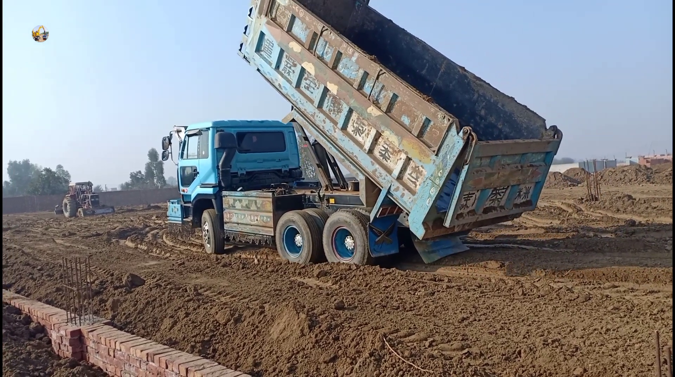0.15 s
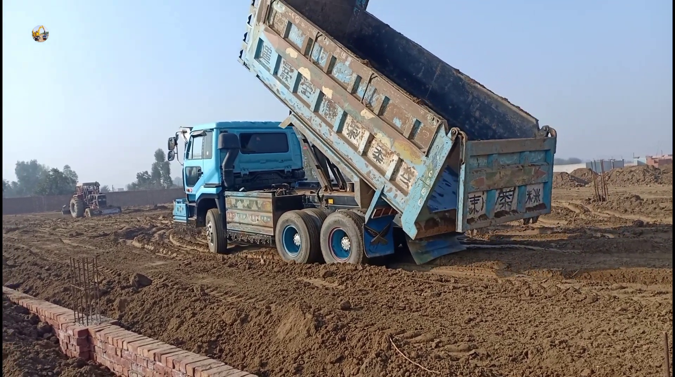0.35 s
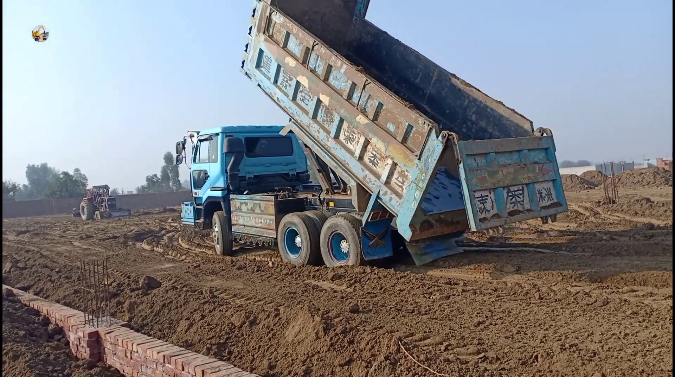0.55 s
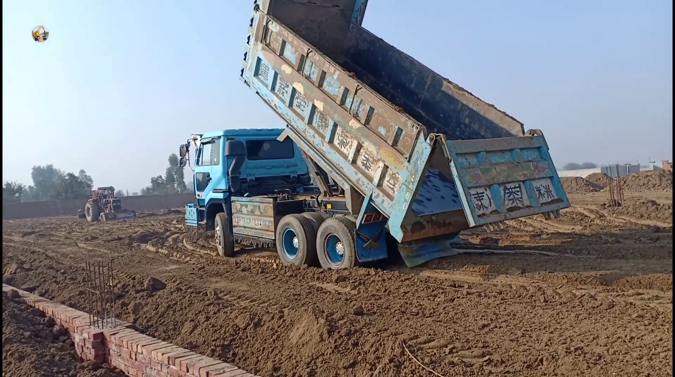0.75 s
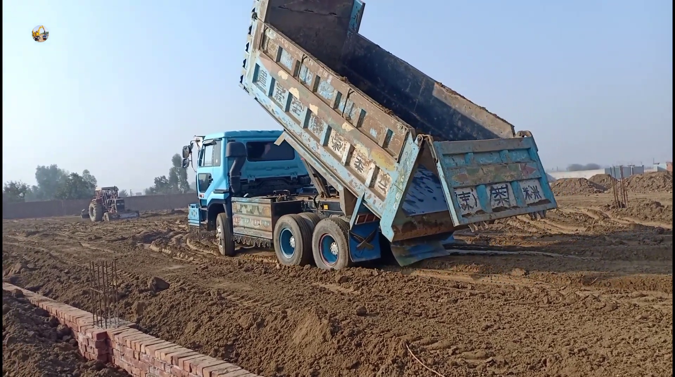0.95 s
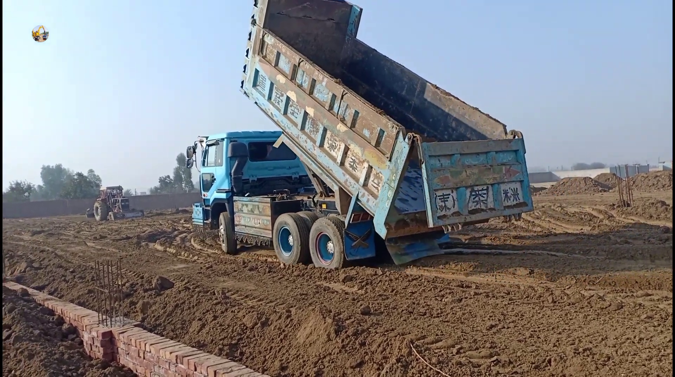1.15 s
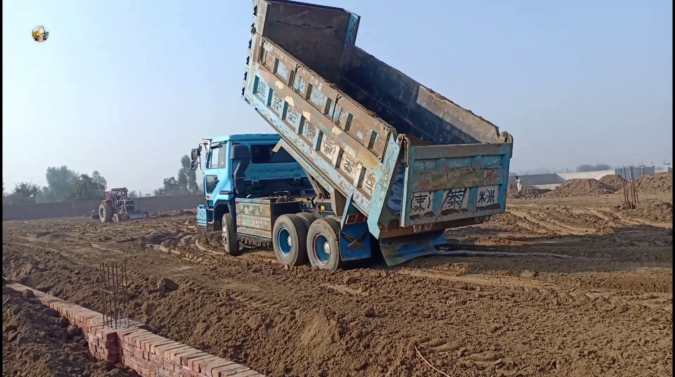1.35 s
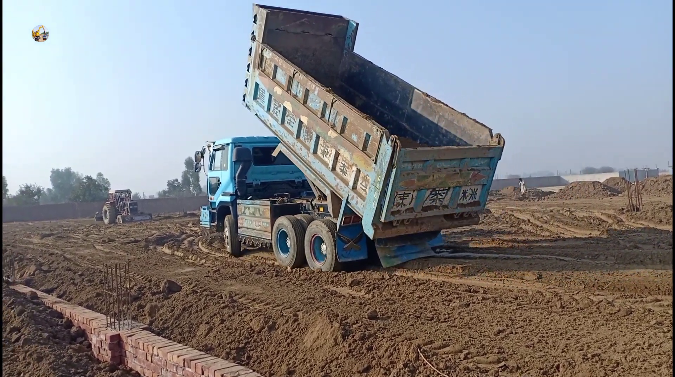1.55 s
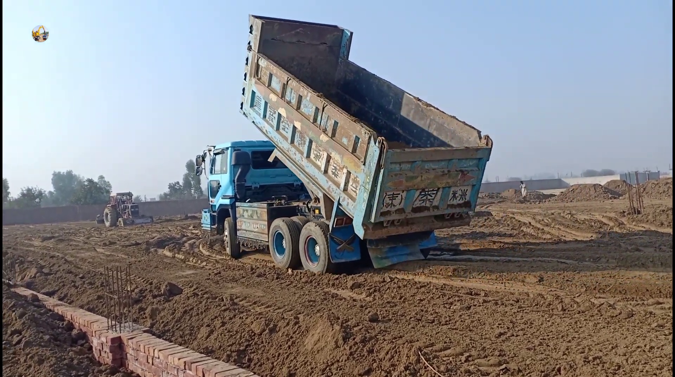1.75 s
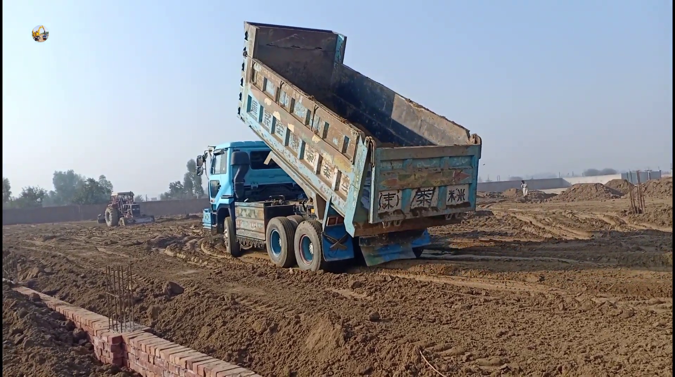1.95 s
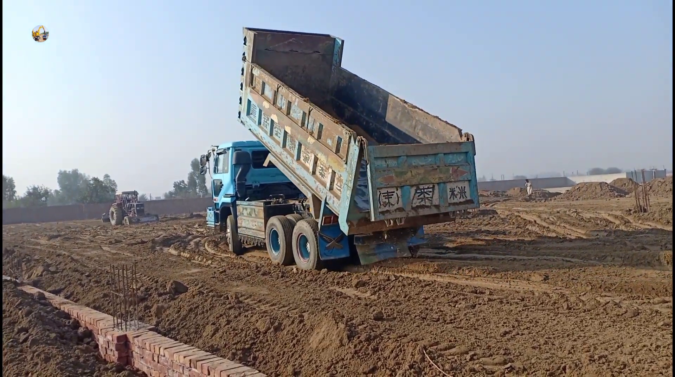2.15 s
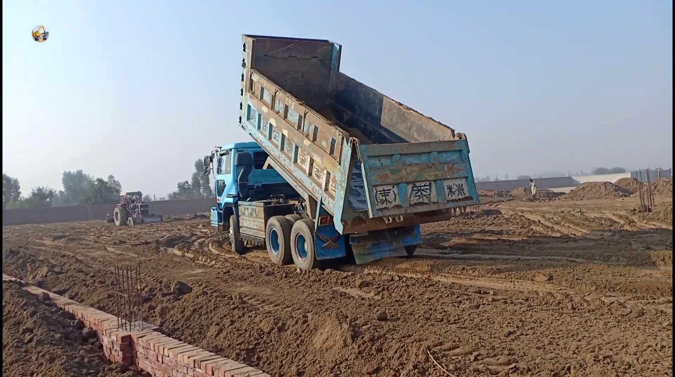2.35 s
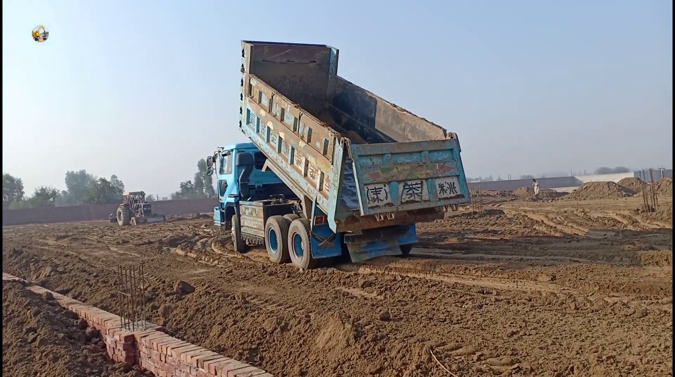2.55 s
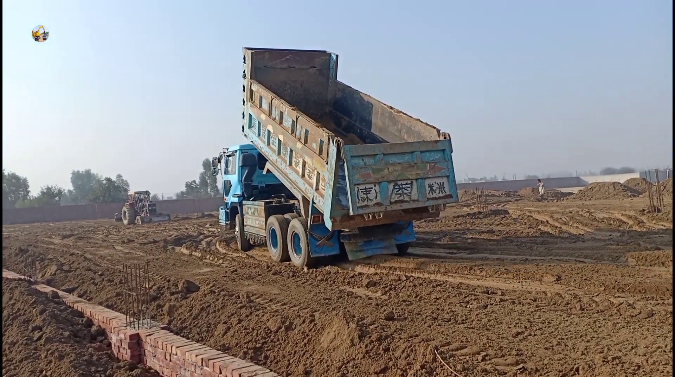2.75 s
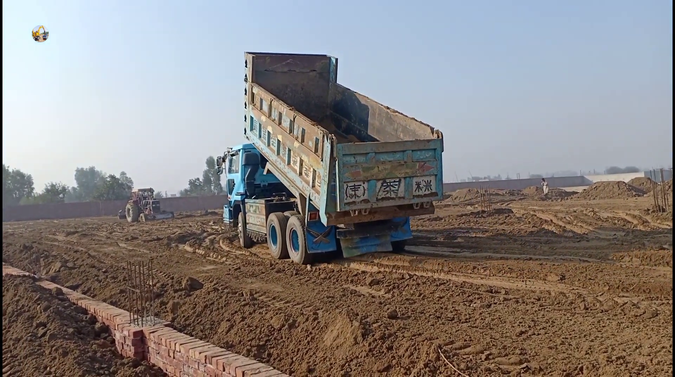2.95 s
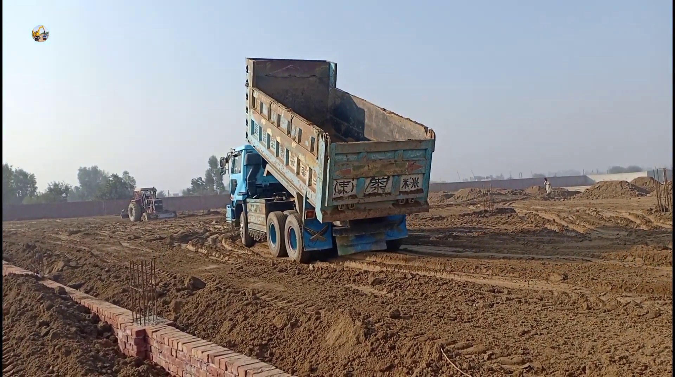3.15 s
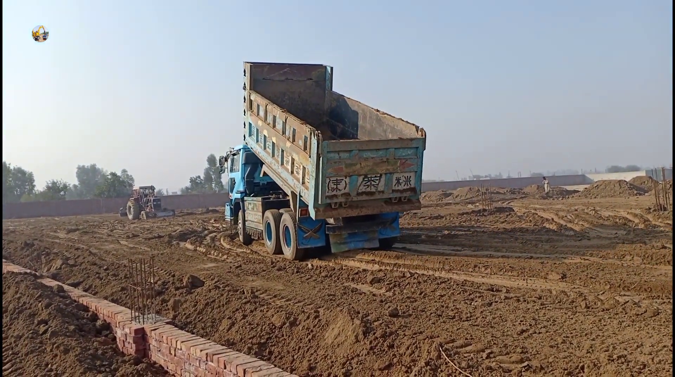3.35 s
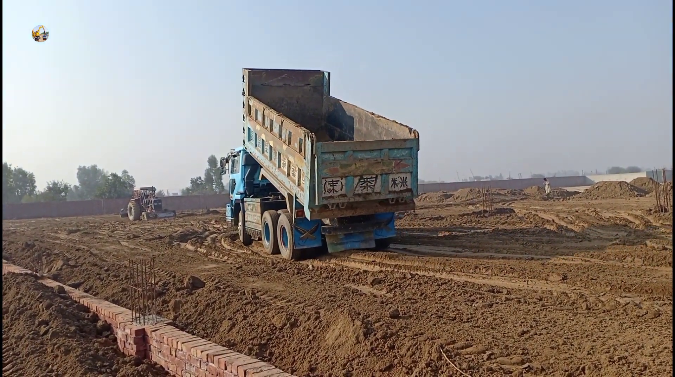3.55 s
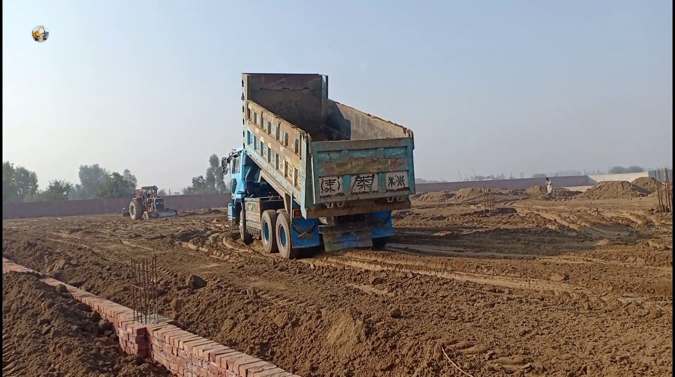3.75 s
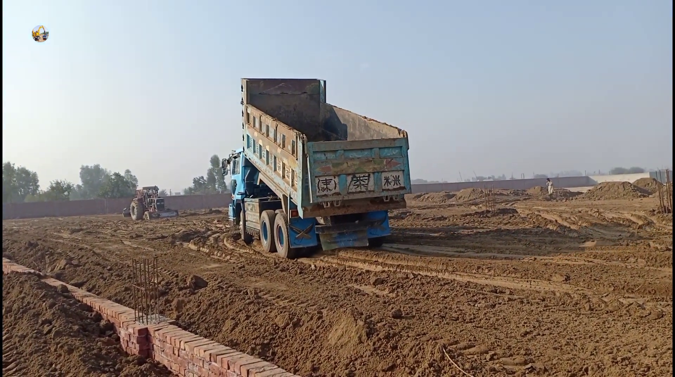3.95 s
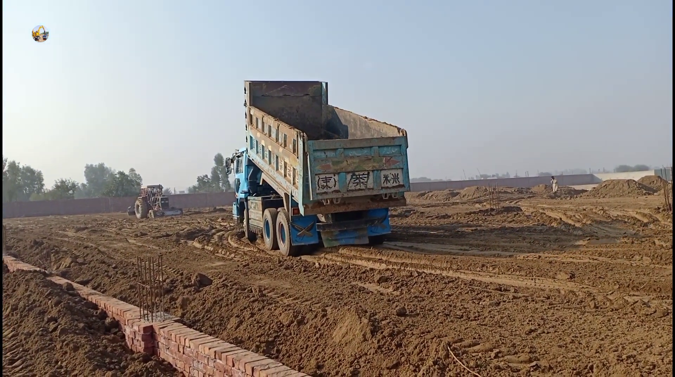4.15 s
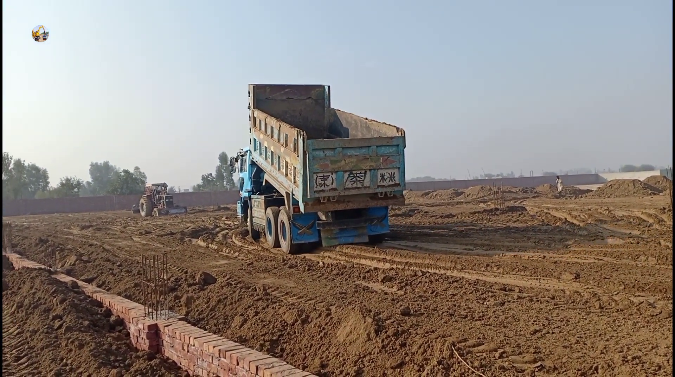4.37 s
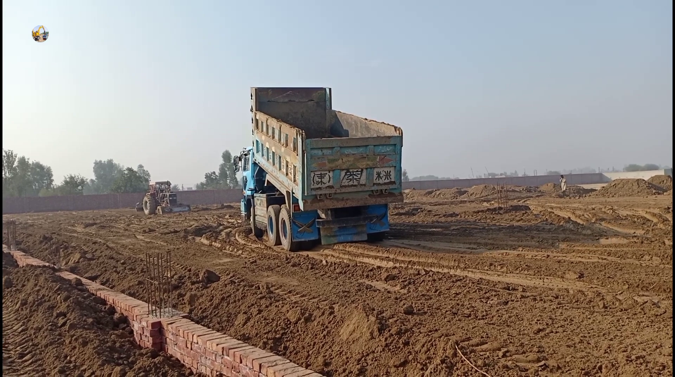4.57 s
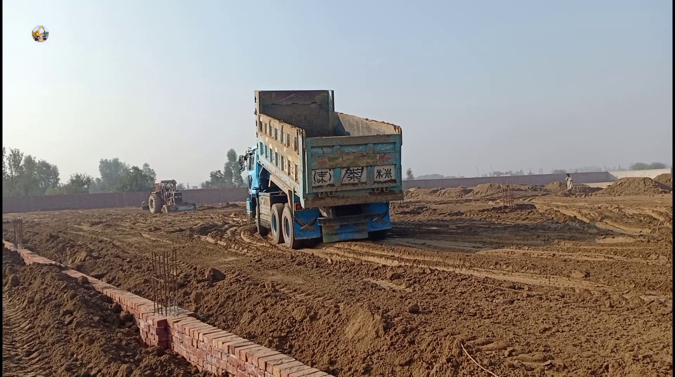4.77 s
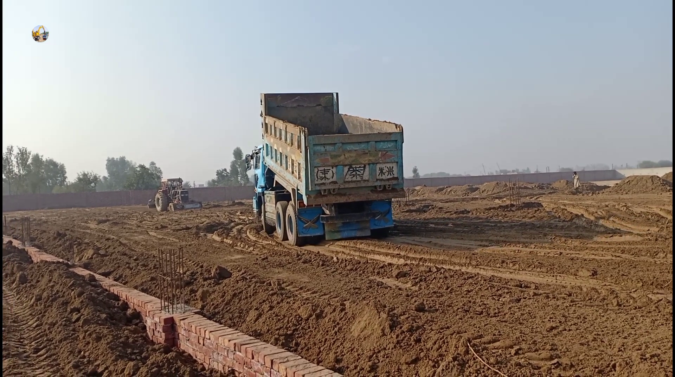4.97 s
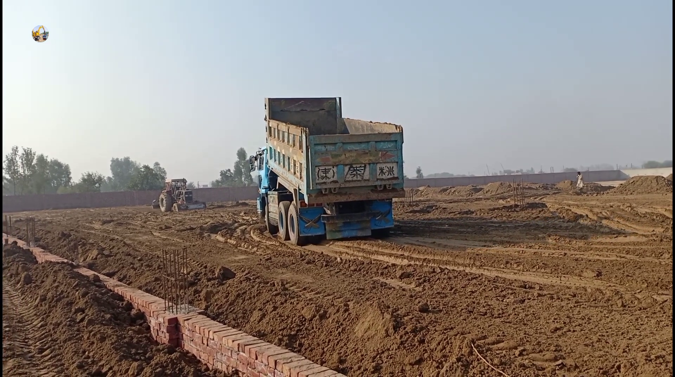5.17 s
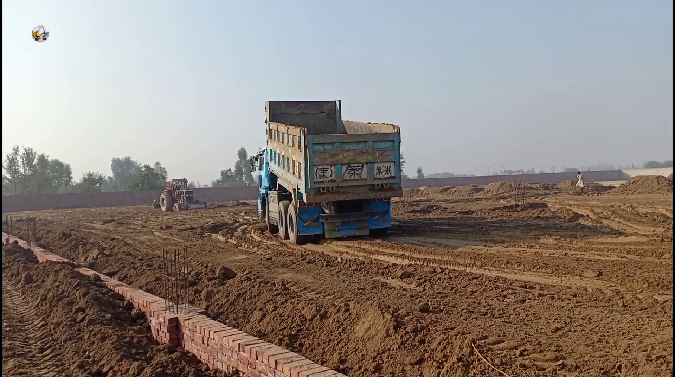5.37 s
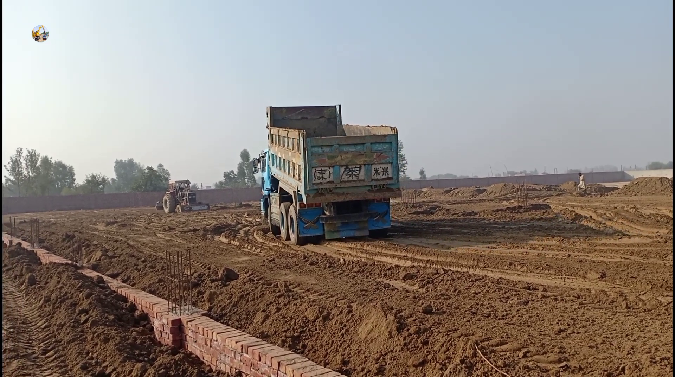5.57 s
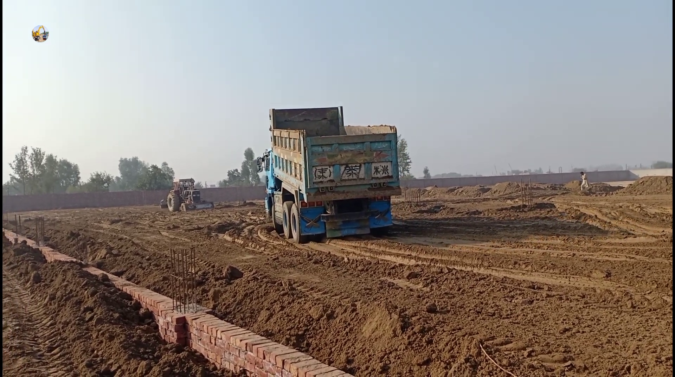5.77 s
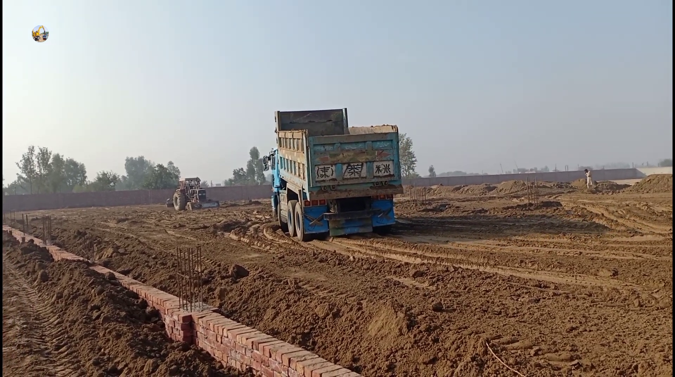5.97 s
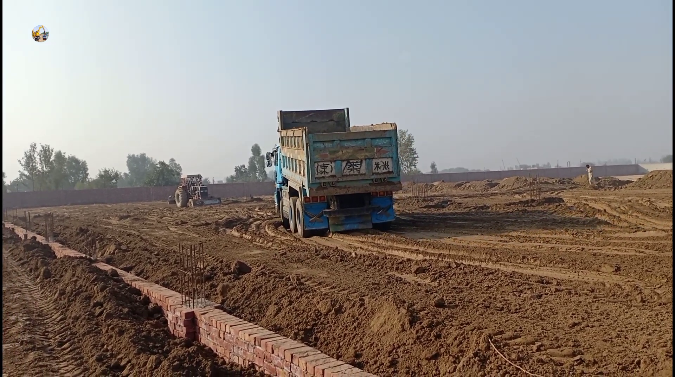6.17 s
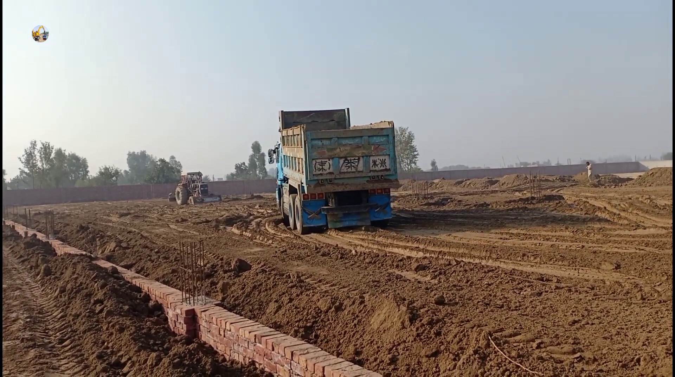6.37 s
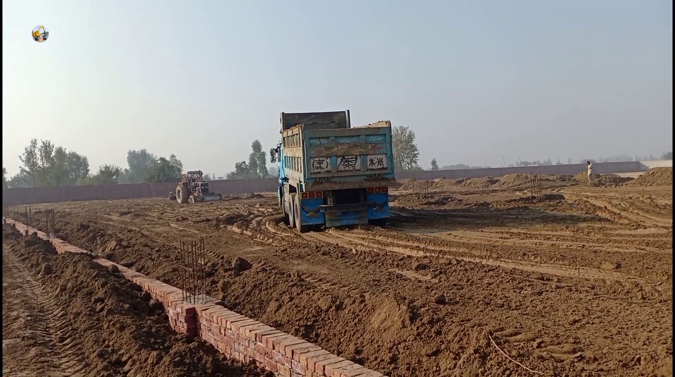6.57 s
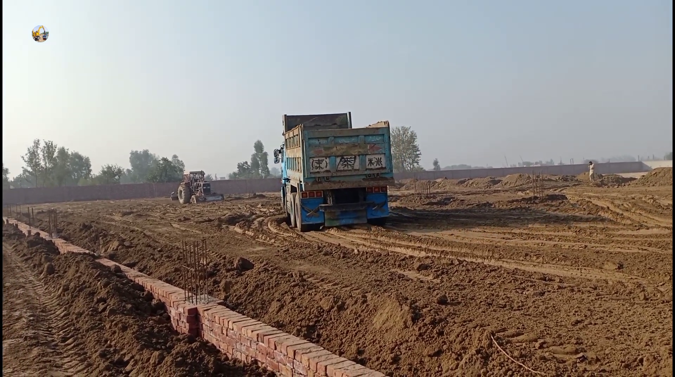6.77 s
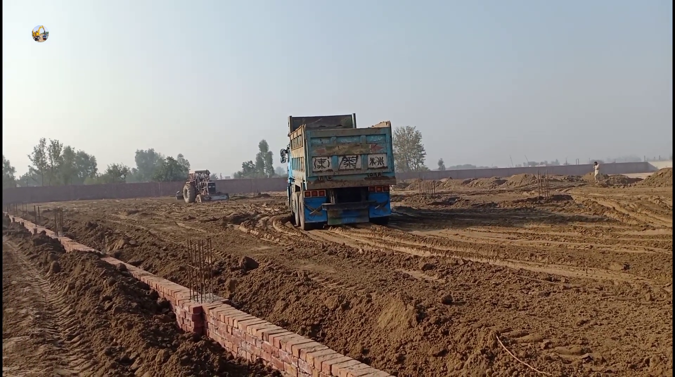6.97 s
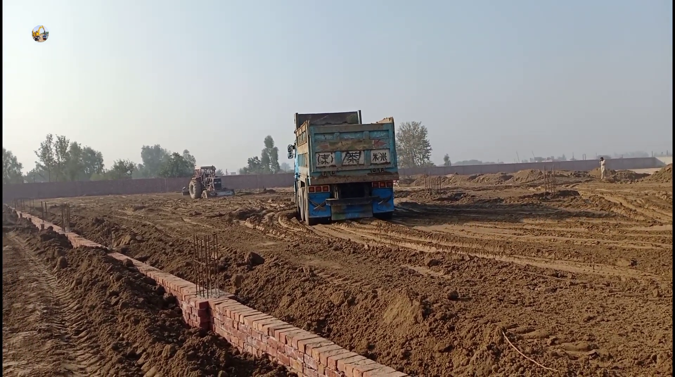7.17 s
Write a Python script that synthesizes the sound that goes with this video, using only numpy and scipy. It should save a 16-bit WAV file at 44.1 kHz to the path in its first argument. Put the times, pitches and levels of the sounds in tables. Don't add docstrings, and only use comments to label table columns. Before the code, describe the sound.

Outdoors on open soil, a diesel dump truck chugs with a low, uneven throb and engine clatter, slowly drawing away. Its loose steel tailgate slams four times, each a deep thump and harsh sheet-metal crash with quick rebounds and a faint bright echo off a wall. Small chain and latch clanks follow. A hand partly covers the right side of the handheld stereo microphone, dulling it, and pops it near the end.

```python
import sys
import numpy as np
from scipy import signal
from scipy.fft import rfft, irfft, next_fast_len
from scipy.io import wavfile
from scipy.ndimage import uniform_filter1d

SR = 44100
rng = np.random.default_rng(int(sys.argv[2]) if len(sys.argv) > 2 else 0)


def volts_from_decibels(level):
    exponent = np.asarray(level, float) / 20
    return 10 ** exponent


def unload_audio(sound):
    columns = np.transpose(np.atleast_2d(sound))
    steps = np.round(np.clip(columns, -1, 1) * 32767)
    wavfile.write(sys.argv[1], SR, steps.astype(np.int16))


N = 318402


def evened(x):
    return x / np.sqrt(np.mean(x ** 2) + 1e-20)


def read(points, hz):
    f, value = np.transpose(points)
    return np.interp(np.log(hz + 1), np.log(f + 1), value)


def add(mix, s, sound):
    part = mix[round(s * SR):][:len(sound)]
    part += sound[:len(part)]


def shaped(x, gain):
    size = next_fast_len(x.shape[-1] + 4096)
    spectrum = rfft(x, size) * gain(np.fft.rfftfreq(size, 1 / SR))
    return irfft(spectrum, size)[..., :x.shape[-1]]


def resonate(x, hz, width):
    pole = np.exp((2j * hz - width) * np.pi / SR)
    return 2 * signal.lfilter([1 - abs(pole)], [1, -pole], x).real


def wander(per_s):
    knots = uniform_filter1d(rng.standard_normal(200), size=3)
    return evened(np.interp(np.arange(N) / SR * 3 * per_s, np.arange(len(knots)), knots))


# [f/Hz, level/dB per Hz]
SHEET_COLOUR = [(24, -50), (40, -26.5), (90, -0.5), (187, -4.5), (329, -4.5), (431, -16.5), (670, -10.5),
                (992, -21.5), (1400, -12.5), (1620, -14.5), (2020, -14), (4210, -21.5), (14000, -86)]
# [f/Hz, t60/s]
SHEET_DECAY = [(60, 0.9), (150, 0.47), (400, 0.77), (800, 0.43), (2000, 0.31), (5000, 0.11), (12000, 0.46)]


def sheet_ring(t):
    hz, frame_t, z = signal.stft(rng.standard_normal(len(t)), SR, nperseg=256)
    decay = volts_from_decibels(-60 * frame_t / read(SHEET_DECAY, hz)[:, None])
    sheet = signal.istft(z * decay, SR, nperseg=256)[1][:len(t)]
    return shaped(sheet, lambda f: volts_from_decibels(read(SHEET_COLOUR, f)))


# [f/Hz, level/dB, t60/s]
PANEL_MODES = [(163.1, -5.5, 1), (203, -7, 1), (233.4, 5.5, 0.07), (339.8, -3, 0.18), (367, -5, 1),
               (530.5, -4, 0.21), (630, -50, 1), (753, -7.5, 0.43), (825, -11, 0.69), (820, -24.5, 0.27),
               (1014, -40, 0.024)]


def panel_ring(t):
    where = rng.standard_normal((len(PANEL_MODES), 2))
    return sum(volts_from_decibels(db + 2.5 * a - 60 * t / min(t60, .5)) * np.sin(2 * np.pi * f * (1 + .02 * b) * t)
               for (f, db, t60), (a, b) in zip(PANEL_MODES, where))


# [f/Hz, width/Hz, level/dB]
RIB_MODES = [(1338, 28, -1), (2005, 60, 6), (2330, 10, 2.5), (2556, 71, 0), (3070, 84, 4.5), (3660, 74, 10),
             (4120, 60, -2.5)]


def blow(treble_db, bass_db, top_db, clang_db, lag_s):
    t = np.arange(30000) / SR
    body = evened(sheet_ring(t)) + volts_from_decibels(-4.5) * evened(panel_ring(t))
    early = t[:SR // 4]
    chatter = rng.standard_normal(SR // 4) ** 5 * np.exp(-early / 0.022)
    chatter = 0.52 * chatter / np.linalg.norm(chatter) + (early == 0)
    ring = signal.fftconvolve(body, chatter)[:len(t)]
    grit = rng.standard_normal(len(t)) ** 3 * np.exp(-t / .06)
    grit = evened(shaped(grit, lambda f: volts_from_decibels(read(SHEET_COLOUR, f))))
    ring = evened(ring) + volts_from_decibels(-8.5) * grit * (t < .3)
    tilt = [(45, bass_db), (90, bass_db + 8.5), (250, 0.019), (400, 0.0091),
            (550, clang_db), (900, clang_db),
            (1700, treble_db + 8), (4300, treble_db + 13), (6000, treble_db + 13),
            (11000, treble_db + 11.5 + top_db), (12500, treble_db + 17 + top_db), (14000, treble_db - 9)]
    ring = ring / np.sqrt(np.mean(ring[:SR // 20] ** 2))
    ring = shaped(ring, lambda f: volts_from_decibels(read(tilt, f) + sum(db / (1 + ((f - at) / w) ** 2)
                                                          for at, w, db in RIB_MODES)))
    thump = shaped(ring, lambda f: 1 / (1 + (f / 600) ** 4))
    steel = ring - thump
    steel_onset = 1 - np.exp(-np.maximum(t - lag_s, 0) / 0.0012)
    return thump * (1 - np.exp(-t / 0.00076)) + steel * steel_onset


# [t/s, level/dB, treble level/dB, top level/dB, clang level/dB]
GATE_BLOWS = [(1.729, -14.5, -11, 0, 12.5), (1.754, -9, -13.5, -2, 8.5), (1.78, -17.5, -11, 6, 2.5),
              (1.819, -12, -16, 13.5, 5), (1.875, -11, -29, 3, -9), (3.321, -13.5, -12.5, 19, 11.5),
              (3.347, -10.5, -9.5, 15, 1.5), (3.399, -10, -15, 10, 3), (3.475, -13.5, -22, -5, 1),
              (4.742, -12.5, -11, 0, 4.5), (4.767, -9, -10, 1, 5), (4.809, -7.5, -22.5, 12, -8),
              (5.693, -14.5, -9, -6, 3.5), (5.719, -18.5, -5, 4.5, 3), (5.749, -12.5, -33, 7, 1.5),
              (4.845, -18, -10, -4, 0)]


def tailgate():
    gate, last_s = np.zeros(N), 0
    for s, db, treble_db, top_db, clang_db in GATE_BLOWS:
        full_swing = s - last_s > .5
        bass_db, lag_s = (-1.5, 0.0039) if full_swing else (-20, 0)
        add(gate, s, volts_from_decibels(db - 5) * blow(treble_db, bass_db, top_db, clang_db, lag_s))
        last_s = s
    return gate


# [slam t/s, delay/s, level/dB, fade/s, width/Hz]
WALL_ECHOES = [
    (1.732, .24, -25, .23, 2000),
    (3.322, .24, -23, 0.39, 2600),
    (4.741, .228, -11.5, 0.1, 1100),
    (5.693, 0.23, -13.5, 0.091, 1100),
]


def wall_echo(gate):
    back, t = np.zeros(N), np.arange(SR // 2) / SR
    for s, delay_s, db, fade_s, width in WALL_ECHOES:
        slam = gate[round(s * SR):][:len(t)]
        bright = resonate(resonate(slam, 2240, width), 2240, width)
        add(back, s + delay_s, volts_from_decibels(db + 5) * bright * np.exp(-t / fade_s))
    return back


# [eighth of the cycle, level/dB, pipe delay/s]
FIRING_ORDER = [(0, -1.2, 0), (5, -12, 0), (3, -.8, 0), (2, -9.6, 0), (7, -23.5, .0041), (6, -5.9, .0041),
                (4, -11, .0041), (1, -8.4, .0041)]


def firings(crank, eighth):
    return np.flatnonzero(np.diff(np.floor(crank - eighth / 8)))


# [f/Hz, level/dB]
PIPE_COLOUR = [(35, -38), (55, -20), (70, -12.3), (85, -13), (100, -7), (109, -2), (122, -5.5),
               (135, -18.5), (150, -23), (180, -24), (230, -40), (400, -62), (1500, -150)]


def exhaust(crank):
    pulses = np.zeros(N)
    for eighth, db, delay_s in FIRING_ORDER:
        at = firings(crank, eighth)
        pulses[np.clip(at + round(delay_s * SR), 0, N - 1)] += volts_from_decibels(db + .6 * rng.standard_normal(len(at)))
    return evened(shaped(pulses, lambda hz: volts_from_decibels(read(PIPE_COLOUR, hz)) * np.exp(-1j * np.arctan((hz - 88) / 6))))


# [f/Hz, width/Hz, level/dB]
COVER_MODES = [(703, 13.3, -29), (850, 13, -26), (1356, 57, -23.5), (2570, 20, -47), (4000, 35, -34),
               (5100, 500, -22)]
# [f/Hz, level/dB per Hz]
BLOCK_COLOUR = [(24, -34.5), (40, -24), (104, 6.5), (133, -5), (156, -18.5), (307, -16), (413, -24.5),
                (635, -20.5), (1340, -24), (1680, -20), (1970, -21), (3980, -23), (9000, -62.5),
                (11700, -86), (19800, -120)]


def block_clatter(crank):
    knock = np.zeros(N)
    for eighth, _, _ in FIRING_ORDER:
        at = firings(crank, eighth)
        knock[at] += volts_from_decibels(1.2 * rng.standard_normal(len(at)))
    bursts = evened(signal.lfilter([1], [1, -np.exp(-1 / (0.012 * SR))], knock))
    noise = (1 + 0.32 * bursts) * volts_from_decibels(.4 * wander(6.0)) * rng.standard_normal(N)
    noise = noise + sum(volts_from_decibels(db) * evened(resonate(noise, hz, width)) for hz, width, db in COVER_MODES)

    def colour(hz):
        ceiling_db = np.where(hz < 170, read(BLOCK_COLOUR, 250) - 3, 0)
        return volts_from_decibels(np.minimum(read(BLOCK_COLOUR, hz), ceiling_db))

    block = shaped(noise, colour)
    treble = shaped(block, lambda hz: 1 / (1 + (1500 / (hz + 1)) ** 4))
    return evened(block - treble), evened(treble)


GEAR_MESHES = (42, 84, 50, 40)
# [mesh index, middle t/s, half length/s, level/dB]
SINGING_SPELLS = [(0, 0.32, 0.37, -45), (1, 1.53, 0.44, -47), (0.5, 2.84, 0.19, -51.5), (0, 4.1, 0.36, -50),
                  (0, 6.85, .5, -47.5), (2, 6.73, 0.48, -50), (2, 3.9, .2, -61), (1.5, 7, 0.27, -61),
                  (0.5, 0.39, .5, -62), (3, 4.6, 0.27, -71)]


def gear_whine(crank):
    t = np.arange(N) / SR
    meshes = [volts_from_decibels(2.0 * wander(1.5)) * np.sin(2 * np.pi * k * crank) for k in GEAR_MESHES]
    singing = sum(volts_from_decibels(db) * np.exp(-((t - s) / half_s) ** 4) * meshes[round(k)]
                  for k, s, half_s, db in SINGING_SPELLS)
    return volts_from_decibels(-68.5) * sum(meshes) + singing


# [t/s, cycles a second]
ENGINE_SPEED = [(0.5, 7.466), (1.2, 7.686), (1.5, 7.647), (1.95, 7.66), (2.3, 8.094), (2.7, 8.441),
                (3.12, 8.096), (3.45, 8.1), (3.9, 7.491), (4.5, 7.195), (5.3, 7.087), (5.5, 7.122),
                (6.25, 6.852), (6.6, 6.822), (6.95, 6.991), (7.1, 7.044)]
# [t/s, level/dB]
THROTTLE_LEVEL = [(.15, -1.5), (.85, -0.5), (1.5, 0.5), (2.3, -3), (2.55, 1), (3.12, 1.5), (3.9, -3.5),
                  (4.2, -2.5), (5.4, 0.5), (6.25, 0), (6.6, 0.5), (6.95, -2), (7.1, -0.5)]


def engine():
    t = np.arange(N) / SR
    speed = uniform_filter1d(np.interp(t, *np.transpose(ENGINE_SPEED)), size=SR // 5)
    crank = np.cumsum(speed) / SR + .455
    throttle_db = np.interp(t, *np.transpose(THROTTLE_LEVEL))
    far_db = -20 * np.log10(1 + 2.42 * t / 12.95)
    exhaust_db = -36 + throttle_db
    clatter_db = -39 + 0.67 * throttle_db + far_db
    treble_db = -44 + 0.88 * throttle_db + 1.33 * far_db
    clatter, treble = block_clatter(crank)
    block = volts_from_decibels(clatter_db) * clatter + volts_from_decibels(treble_db) * treble
    return volts_from_decibels(exhaust_db) * exhaust(crank) + block + gear_whine(crank)


# [t/s, level/dB, f/Hz, spread/Hz, length/s]
LOOSE_PARTS = [(0.759, -38, 3400, 1780, .013), (.858, -59, 5700, 300, .018),
               (1.779, -33, 9300, 2500, 0.0015), (5.498, -55, 4000, 2370, .019), (6.055, -37, 230, 191, .1),
               (6.271, -47, 3700, 2000, .012), (6.343, -48, 4600, 2380, .006),
               (6.441, -44.5, 630, 60, .036), (6.444, -30, 869, 25.2, .04), (6.514, -40, 840, 250, .076),
               (6.532, -37.5, 1310, 324, 0.025), (6.53, -51, 4000, 1500, 0.061),
               (6.448, -53, 4200, 2000, .02), (6.672, -52, 4400, 2500, .011),
               (5.715, -23.5, 162.6, 30, 0.0904)]


def clanks():
    out = np.zeros(N)
    for s, db, hz, spread, length_s in LOOSE_PARTS:
        t = np.arange(round(3 * length_s * SR)) / SR
        ring = rng.standard_normal(SR // 2)
        for width in (spread, spread, 2 * spread):
            ring = resonate(ring, hz, width)
        swell = np.minimum(t / 0.001, 1) * np.exp(-(t / length_s) ** 2)
        add(out, s, volts_from_decibels(db) * evened(ring[-len(t):]) * swell)
    return out


def scene():
    gate = tailgate()
    truck = gate + wall_echo(gate) + engine() + clanks()
    return np.array([truck, truck])


POP_S = 6.80725


def pop():
    out, t = np.zeros(N), np.arange(-200, 2000) / SR
    spike_s = .00017
    spike = volts_from_decibels(-.7) * np.exp(-abs(t / spike_s) ** 1.6)
    after = np.clip(t - 3 * spike_s, 0, None)
    recoil = volts_from_decibels(-3.5 - 60 * after / .015) * np.sin(2 * np.pi * 225 * after)
    whistle = volts_from_decibels(-37) * np.sin(2 * np.pi * 10000 * t) * np.exp(-abs(t) / .0002)
    add(out, POP_S + t[0], recoil + whistle - spike)
    return out


# [f/Hz, level/dB]
COVERED_PORT = [(60, 1), (200, .3), (380, -2.5), (700, -5), (1300, -10.5), (2300, -16), (4200, -25.5),
                (6000, -20), (9000, -3), (12000, -9), (15000, -5)]
# [f/Hz, lag/radians]
COVERED_LAG = [(0, 0), (90, .2), (300, .4), (800, .8), (1150, 1), (1600, -3), (2400, -8), (3000, -15),
               (5000, -23)]
# [f/Hz, share from 0 to 1]
LIKENESS = [(250, .999), (700, .97), (1300, .85), (2500, .7), (4500, .5), (8000, .35)]


def covered_port(x):
    hz, _, z = signal.stft(x, SR, nperseg=256)
    same = np.clip(read(LIKENESS, hz), 0, 1)[:, None]
    scatter = np.exp(2j * np.pi * rng.random(z.T.shape).T) * np.sqrt(2)
    leak = np.sqrt(1 - same ** 2) * scatter
    right = signal.istft(z * (same + leak), SR, nperseg=256)[1][:N]
    right = shaped(right, lambda f: 2 / (1 + volts_from_decibels(-read(COVERED_PORT, f))) * np.exp(-1j * read(COVERED_LAG, f)))
    return right + pop()


# [f/Hz, width/Hz, depth/dB]
BODY_NOTCHES = [(513, 37, 4.5), (1031, 55, 8), (1660, 40, 8), (2913, 111, 7.5), (3573, 170, 10.5),
                (11000, 1100, -3.5)]


def open_port(x):
    def colour(hz):
        notch_db = -sum(db / (1 + ((hz - f) / w) ** 2) for f, w, db in BODY_NOTCHES)
        return volts_from_decibels(notch_db) * 2 / (1 + volts_from_decibels(read(COVERED_PORT, hz)))

    left = shaped(x, colour)
    treble = shaped(left, lambda f: 1 / (1 + (2500 / (f + 1)) ** 4))
    left = left - (1 - volts_from_decibels(-3.5)) * (np.arange(N) > POP_S * SR) * treble
    return .9 * np.tanh(left / .9)


# [f/Hz, level/dB per Hz]
HISS_COLOUR = [(2940, -49), (5000, -10.5), (5720, -15), (8460, -18.5), (8740, -17.5), (9950, -21.5),
               (11500, -12), (12900, -26), (14000, -22), (15200, -41)]


def hiss():
    noise = shaped(rng.standard_normal((2, N)), lambda f: volts_from_decibels(read(HISS_COLOUR, f)))
    return volts_from_decibels(-76 + np.array([[4.], [-1.5]])) * evened(noise)


def top_cut(x):
    return signal.sosfilt(signal.butter(12, 15350, fs=SR, output="sos"), x)


def record(dry):
    ports = np.array([open_port(dry[0]), covered_port(dry[1])])
    return top_cut(ports + hiss())


dry = scene()
out = record(dry)
unload_audio(out)
```